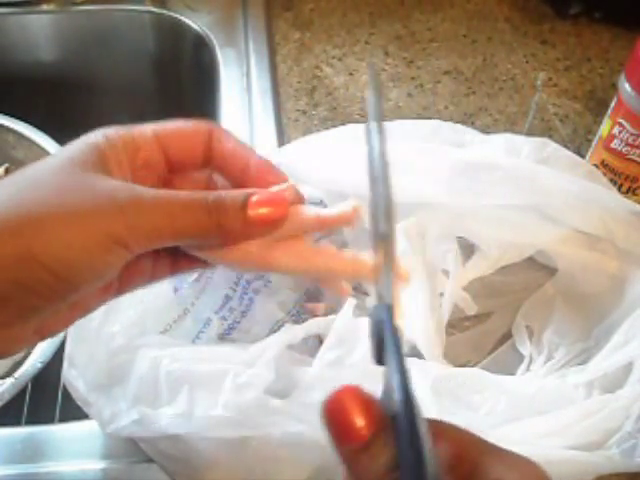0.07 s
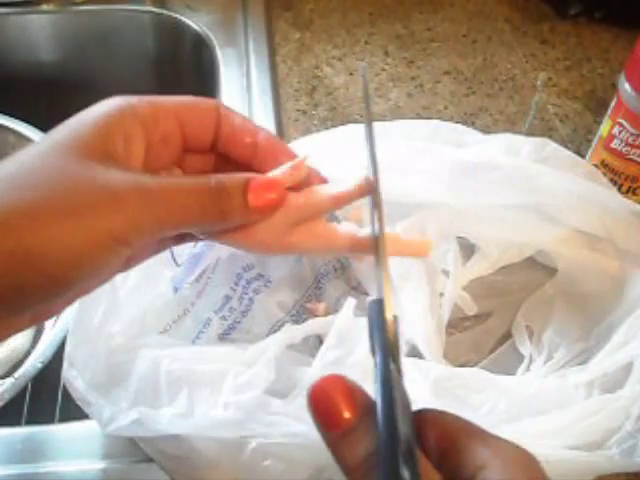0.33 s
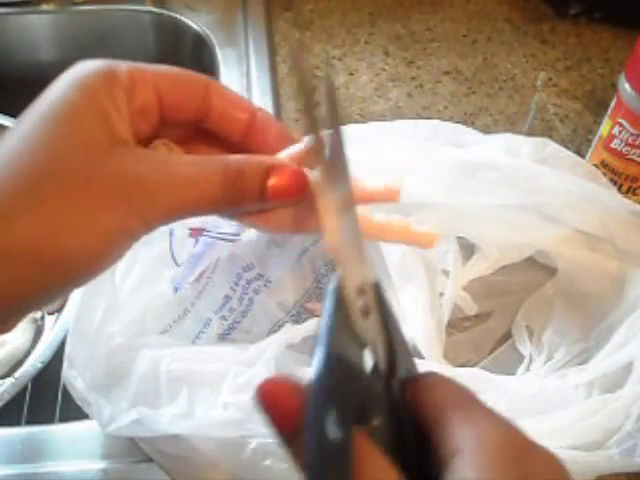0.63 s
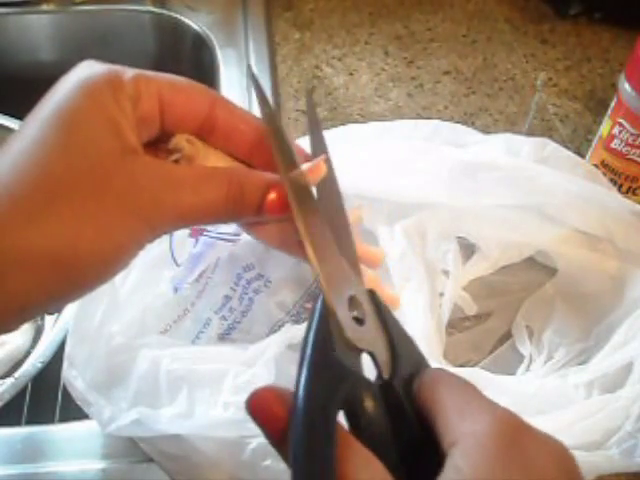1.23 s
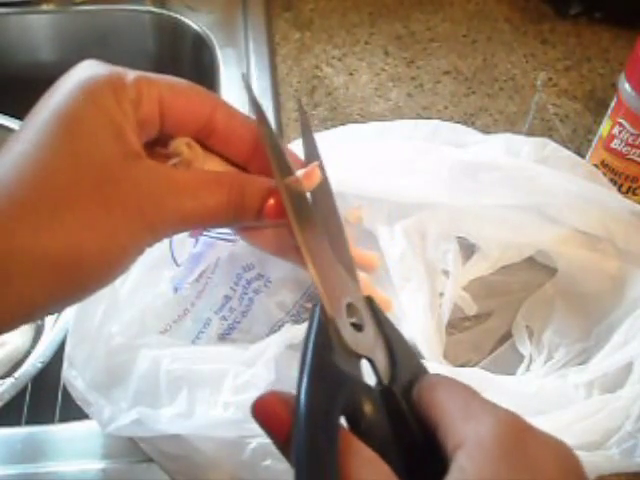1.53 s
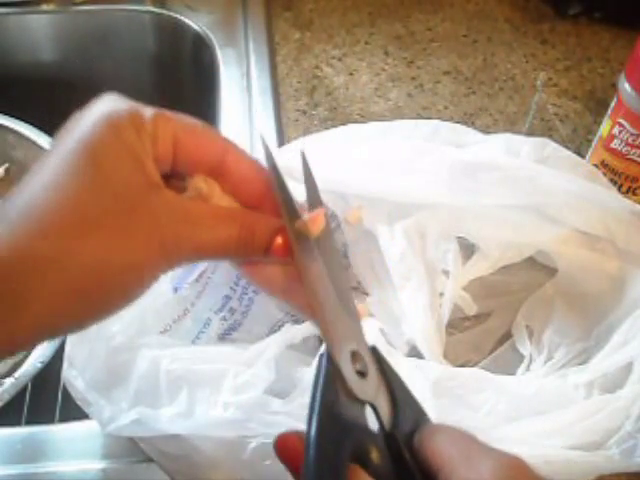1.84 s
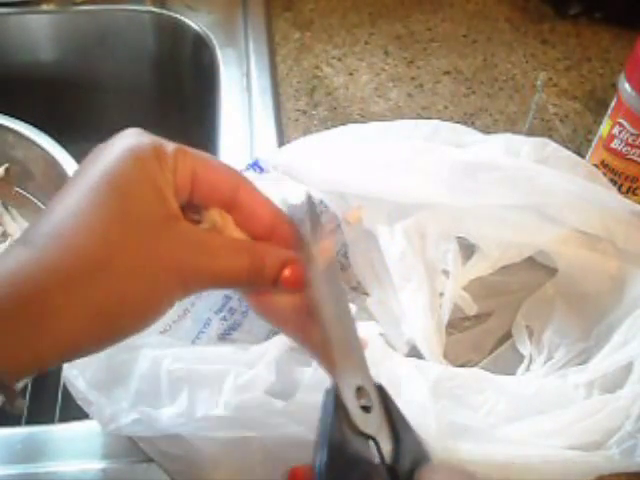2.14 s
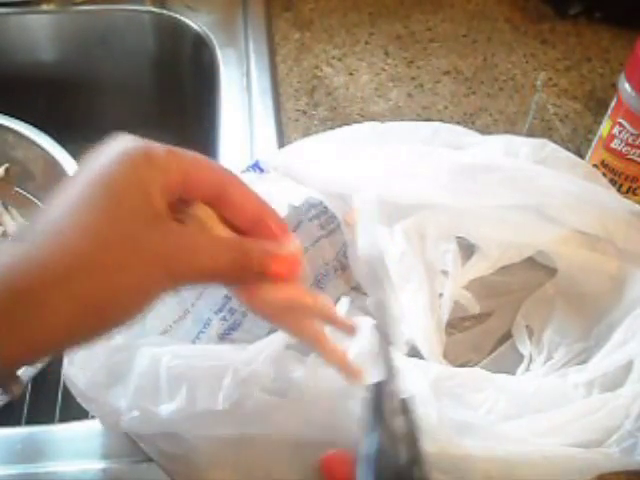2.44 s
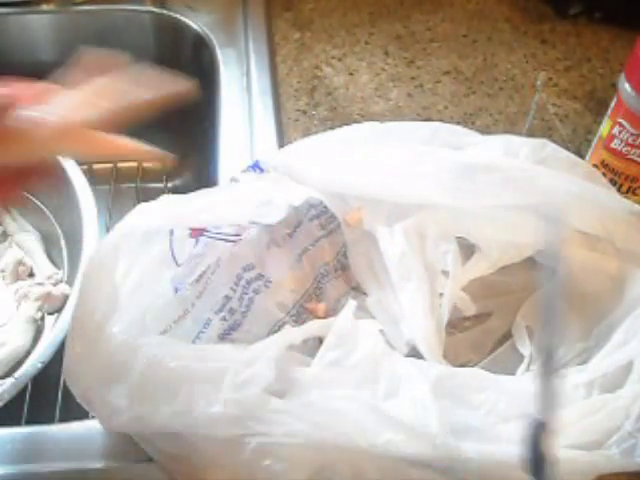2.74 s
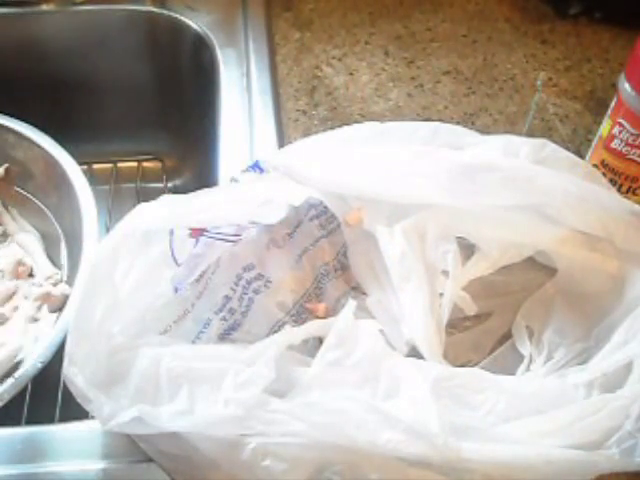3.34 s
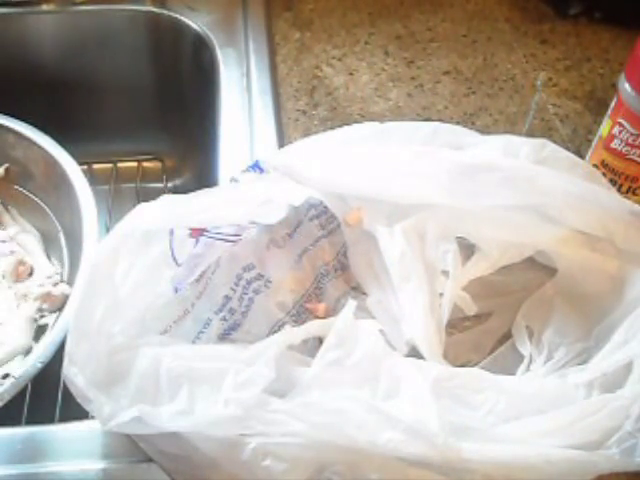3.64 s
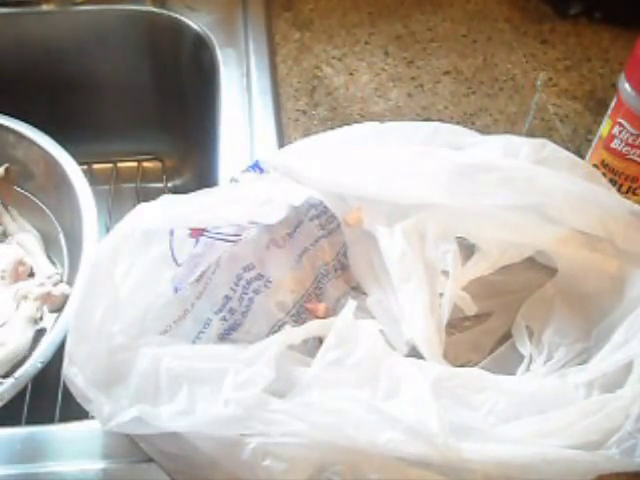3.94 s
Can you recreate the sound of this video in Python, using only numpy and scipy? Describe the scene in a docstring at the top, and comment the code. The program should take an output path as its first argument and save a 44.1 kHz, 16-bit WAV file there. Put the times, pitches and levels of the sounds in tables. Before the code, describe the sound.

Scissors clack open, tick, then snap shut through a chicken foot with a crack and a short crunch, close by in a small kitchen. A plastic bag crinkles faintly afterwards, over a steady appliance hum and hiss.

```python
"""A small kitchen. Scissors open with a dull clack and cut into a chicken foot: the blades tick as they
take hold, the claw cracks and the blades snap shut, their steel ringing. Gristle crunches, then a plastic
bag crinkles faintly, with a few small plinks by the sink. The counter and the room answer the clicks.
An appliance motor hums throughout, over a rush of air, hiss and a thin electrical whine."""
import sys
import numpy as np
from scipy import signal
from scipy.fft import rfft, irfft, next_fast_len
from scipy.io import wavfile
from scipy.ndimage import map_coordinates

SR = 44100
rng = np.random.default_rng(int(sys.argv[2]) if len(sys.argv) > 2 else 0)


def wrap_up_sound(samples):
    """Save the sound to the file named by the first command line argument, as 16-bit audio."""
    columns = np.atleast_2d(samples).T
    # keep every value between -1 and 1, then stretch to whole-number steps
    tamed = np.clip(columns, -1, 1)
    steps = np.round(tamed * 32767).astype(np.int16)
    wavfile.write(sys.argv[1], SR, steps)


N = 176400
TOP_HZ = 10800


def amp(db):
    """dB to amplitude."""
    return 10 ** (np.asarray(db) / 20)


def unit_rms(x):
    """Scale to rms 1."""
    return x / np.sqrt(np.mean(x ** 2) + 1e-20)


def unit_energy(x):
    """Scale to energy 1."""
    return x / (np.linalg.norm(x) + 1e-20)


def curve(points, hz):
    """Interpolate (freq_hz, value) points on a log frequency axis."""
    freq_hz, values = np.transpose(points)
    return np.interp(np.log(hz + 1), np.log(freq_hz + 1), values)


def resonance(centre_hz, width_oct):
    """One band, as a function from Hz to dB."""
    return lambda hz: -20 * np.log10(1 + (np.log2((hz + 1) / centre_hz) / width_oct) ** 2 / 2)


def wobble(rate_hz):
    """Smooth random curve, rate_hz knots a second."""
    knots = rng.standard_normal(int(N * rate_hz / SR) + 4)
    return map_coordinates(knots, [np.arange(N) * rate_hz / SR])


def add(track, start_s, x):
    """Mix x into the track."""
    part = track[round(start_s * SR):][:len(x)]
    part += x[:len(part)]


def coloured(x, db_at):
    """Minimum-phase filter: gain db_at(hz), rolled off above TOP_HZ."""
    size = 2 * next_fast_len(len(x))
    hz = np.fft.rfftfreq(size, 1 / SR)
    gain = amp(db_at(hz)) / (1 + (hz / TOP_HZ) ** 30)
    cepstrum = irfft(np.log(gain + 1e-5))
    cepstrum[1:size // 2] *= 2
    cepstrum[size // 2 + 1:] = 0
    return irfft(rfft(x, size) * np.exp(rfft(cepstrum)))[:len(x)]


def crack(decay_s, db_at, size=2048):
    """Fracture or impact: a noise burst, spectrum evened then coloured, energy 1."""
    burst = rng.standard_normal(size) * np.exp(-np.arange(size) / SR / decay_s)
    spectrum = rfft(burst, 2 * size)
    evened = irfft(spectrum / np.sqrt(np.abs(spectrum) + 1e-9))[:size]
    return unit_energy(coloured(evened, db_at))


# Motor hum: shaft_multiple, level_db
MOTOR_ORDERS = [(1, -60.5), (3, -69), (4, -60.5), (5, -52), (6, -58.5), (9, -70), (10, -64), (11, -64.5),
                (12, -71.5), (14, -69), (30, -72.5), (31, -75), (37.4, -80)]
# Other steady tones: pitch_hz, level_db, wander_rad
STEADY_TONES = [(328.2, -61.5, .4), (403.6, -61, 1), (473, -73, 0.82), (669, -74.5, 0.34)]
# Air and hiss spectrum: freq_hz, gain_db
AIR_COLOUR = [(5, -4), (30, 2), (55, 1.5), (75, -2.5), (200, -4), (235, -2.5), (290, -5.5), (320, -1.5),
              (360, -6), (400, -1.5), (450, -5.5), (600, -9), (800, -13.5), (1300, -17), (1600, -17),
              (2300, -19.5), (4000, -22), (7300, -24.5), (9000, -23), (10500, -25.5)]


def appliance(shaft_hz=52.12, drift_rad=0.072, flutter=0.091, air_db=-48):
    """Slightly unsteady motor orders, tones and electrical whine over rushing air and hiss."""
    whine_hz, whine_db, whine_wander_rad = 7140, -69.5, 0.17
    t = np.arange(N) / SR
    shaft_rad = 2 * np.pi * shaft_hz * t + drift_rad * wobble(1.995)
    partials = [(multiple * shaft_rad, level_db) for multiple, level_db in MOTOR_ORDERS]
    for pitch_hz, level_db, wander_rad in [*STEADY_TONES, (whine_hz, whine_db, whine_wander_rad)]:
        partials.append((2 * np.pi * pitch_hz * t + wander_rad * wobble(9), level_db))
    hum = np.zeros(N)
    for phase_rad, level_db in partials:
        envelope = np.sqrt(2) * amp(level_db) * (1 + flutter * wobble(8))
        hum += envelope * np.sin(phase_rad + 2 * np.pi * rng.random())
    air = coloured(rng.standard_normal(N), lambda hz: curve(AIR_COLOUR, hz))
    return hum + amp(air_db) * unit_rms(air)


# Counter and cabinet reflections: delay_s, gain
REFLECTIONS = [(.0037, 0.2), (.0063, 0.35), (.0088, .2), (0.0127, 0.19)]
# Room decay: freq_hz, t60_s
ROOM_DECAY = [(300, 0.8), (3000, 0.2), (10000, 0.16)]


def in_kitchen(x, wet=1, tail_db=-3.5, scatter_db=-3, scatter_decay_s=0.0052):
    """Direct sound plus reflections, scatter off nearby things and a short tail, drawn anew each call."""
    hz, frame_s, spectra = signal.stft(rng.standard_normal(SR // 3), SR, nperseg=256)
    fade = amp(-60 * frame_s / curve(ROOM_DECAY, hz)[:, None])
    tail = signal.istft(spectra * fade, SR, nperseg=256)[1]
    t = np.arange(len(tail)) / SR
    onset = 1 - np.exp(-t / 0.003)
    scatter = rng.standard_normal(len(t)) * np.exp(-t / scatter_decay_s)
    response = amp(tail_db) * unit_energy(tail * onset) + amp(scatter_db) * unit_energy(scatter * onset)
    for delay_s, gain in REFLECTIONS:
        response[round(delay_s * SR)] += gain
    out = wet * signal.fftconvolve(x, response)
    add(out, 0, x)
    return out


# Opening clack: start_s, level_db
CLACKS = [(0.627, -26), (0.6271, -22.5)]
# Clack spectrum: freq_hz, gain_db
CLACK_COLOUR = [(500, -24), (1300, -6), (1900, -4), (2500, -7), (3400, 2), (3900, -8), (5000, 1.5),
                (6300, -1.5), (7400, -13), (8500, -3), (10500, -17)]


def scissors_open(decay_s=0.002):
    """The blades part with one dull clack."""
    out = np.zeros(N)
    for start_s, level_db in CLACKS:
        clack = crack(decay_s, lambda hz: curve(CLACK_COLOUR, hz))
        add(out, start_s, amp(level_db) * in_kitchen(clack))
    return out


# Blade clicks and claw cracks: start_s, level_db, decay_s, tilt_db_per_oct
SNIPS = [(1.5265, -24.5, 0.0024, -0.5), (1.5295, -22, 0.0025, 2), (1.8695, -18.5, 0.0014, 7),
         (2.097, -18, 0.0015, 1), (2.1001, -6.5, 0.001, 7), (2.103, -13, 0.00062, 1.5),
         (2.1057, -16, .0007, -1), (2.1753, -17, 0.0013, 0.5), (2.1786, -9, 0.0018, 6),
         (2.183, -14, .003, 9.5), (2.187, -15.5, 0.0035, -3.5), (2.1915, -16.5, 0.0054, 7),
         (2.2232, -12.5, 0.0021, 4)]
# Snip spectrum before tilt: freq_hz, gain_db
BLADE_COLOUR = [(200, -31), (600, -18), (1000, -6.5), (1700, -10.5), (3300, -5.5), (4100, -7), (5500, -4.5),
                (7200, -6), (8100, -2), (9600, -0.5), (11000, -12)]
# Steel blade modes: pitch_hz
BLADE_MODES_HZ = [3203, 3520, 4923, 5222, 5890, 7967, 8307, 8920, 9092, 9236, 9740, 9860]
# Ring of each mode: gain_db, t60_s
BLADE_RING = [(-2, 0.17), (-7, .12), (-3, 0.073), (-6, .08), (-5, 0.14), (-6, .25), (-8, 0.1), (2, 0.17),
              (-5, 0.18), (-3, .12), (0.5, .15), (-13, .2)]


def scissors_cut(ring_db=-10, spread_db=2):
    """Blades click and the claw cracks; each burst rings the steel."""
    out, t = np.zeros(N), np.arange(SR // 4) / SR
    pitch_hz, gain_db, t60_s = np.column_stack([BLADE_MODES_HZ, BLADE_RING]).T[:, :, None]
    for start_s, level_db, decay_s, tilt in SNIPS:
        struck_db = gain_db + tilt * np.log2(pitch_hz) + rng.normal(0, spread_db, pitch_hz.shape)
        modes = np.sin(2 * np.pi * (pitch_hz * t + rng.random(pitch_hz.shape)))
        ring = np.sum(amp(struck_db - 60 * t / t60_s) * modes, axis=0)
        snip = amp(ring_db) * unit_energy(ring)
        add(snip, 0, crack(decay_s, lambda hz: curve(BLADE_COLOUR, hz) + tilt * np.log2(1 + hz / 1000)))
        add(out, start_s, amp(level_db) * in_kitchen(snip))
    return out


def blade_bite(start_s=1.8418, level_db=-23.5, decay_s=0.00046):
    """A blade first bites: one dry tick, no ring."""
    out = np.zeros(N)
    add(out, start_s, amp(level_db) * crack(decay_s, resonance(centre_hz=6700, width_oct=0.41)))
    return out


# Gristle ticks: start_s, level_db
GRISTLE_TICKS = [(2.0696, -33), (2.2823, -29), (2.302, -24), (2.3202, -34), (2.33, -21), (2.358, -23),
                 (2.4478, -30.5), (2.4647, -25.5)]
# Crunch swells: peak_s, rise_s, fall_s, level_db
CRUNCHES = [(2.135, 0.052, 0.047, -46.5), (2.25, 0.018, .03, -51), (2.325, 0.02, 0.018, -44),
            (2.40, 0.016, 0.059, -51)]
# Gristle spectrum: freq_hz, gain_db
GRISTLE_COLOUR = [(300, -15), (1000, -9), (2200, -2), (4200, -4.5), (6300, 0), (7600, -2), (9500, 3.5),
                  (11000, -2)]


def gristle(tick_decay_s=0.00076, grain_db=3.0):
    """Gristle gives under the blades: single ticks and swells of fine tearing grains."""
    ticks, swells, t = np.zeros(N), np.zeros(N), np.arange(N) / SR
    colour = lambda hz: curve(GRISTLE_COLOUR, hz)
    for start_s, level_db in GRISTLE_TICKS:
        add(ticks, start_s, amp(level_db) * crack(tick_decay_s, colour))
    for peak_s, rise_s, fall_s, level_db in CRUNCHES:
        swells += amp(level_db) * np.exp(-np.maximum((peak_s - t) / rise_s, (t - peak_s) / fall_s))
    grains = rng.standard_normal(N) * amp(grain_db * wobble(500))
    return ticks + swells * unit_rms(coloured(grains, colour))


# Bag crinkles: start_s, level_db, centre_hz, width_oct
CRINKLES = [(2.989, -26.5, 9900, .12), (2.994, -33, 9850, .12), (3.2183, -25.5, 5500, 1),
            (3.221, -28.5, 3370, 0.092), (3.238, -29, 6500, .6), (3.262, -24.5, 8200, 0.2),
            (3.296, -26.5, 4850, 0.98), (3.7462, -28, 6000, 1), (3.772, -28, 8400, 0.18),
            (3.817, -28.5, 4500, 0.31), (3.95, -33, 9400, .06), (3.964, -29, 7000, 0.81),
            (3.987, -27.5, 7500, 0.93)]


def plastic_bag(decay_s=0.002):
    """Each fold of thin plastic pops in its own band."""
    out = np.zeros(N)
    for start_s, level_db, centre_hz, width_oct in CRINKLES:
        add(out, start_s, amp(level_db) * crack(decay_s, resonance(centre_hz, width_oct)))
    return out


# Plinks: start_s, level_db, pitch_hz
PLINKS = [(3.807, -26, 3090), (3.819, -30, 2300), (3.9862, -24, 2480)]


def sink_plinks(decay_s=0.0025):
    """Small plinks by the sink, each one damped sine."""
    out, t = np.zeros(N), np.arange(SR // 10) / SR
    for start_s, level_db, pitch_hz in PLINKS:
        tone = np.sin(2 * np.pi * pitch_hz * t) * np.exp(-t / decay_s)
        add(out, start_s, amp(level_db) * unit_energy(tone))
    return out


def scene():
    """Cutting and crinkling close by, the appliance behind; mono."""
    scissors = scissors_open() + scissors_cut() + blade_bite()
    crinkles_and_plinks = in_kitchen(plastic_bag() + sink_plinks())[:N]
    crunch = in_kitchen(gristle(), wet=0.34)[:N]
    return (appliance() + scissors + crunch + crinkles_and_plinks)[None]


def record(dry):
    """Steep low-pass at TOP_HZ."""
    size = next_fast_len(N + SR // 2)
    hz = np.fft.rfftfreq(size, 1 / SR)
    gain_db = np.interp(hz - TOP_HZ, [-400, 0, 200, 500, 1400], [0, -4, -14, -30, -70])
    return irfft(rfft(dry, size) * amp(gain_db), size)[..., :N]


dry = scene()
out = record(dry)
wrap_up_sound(out)
```